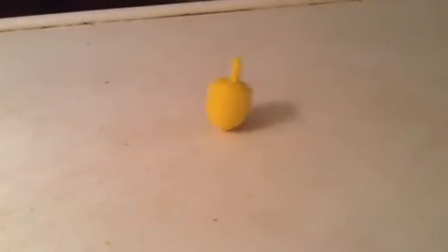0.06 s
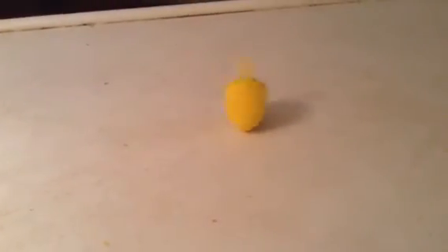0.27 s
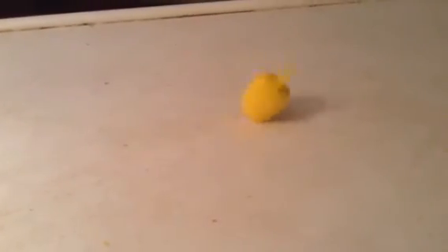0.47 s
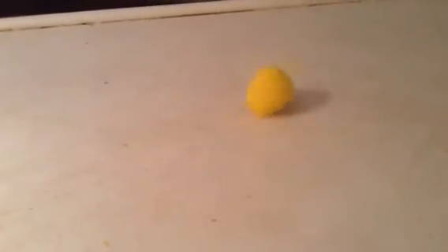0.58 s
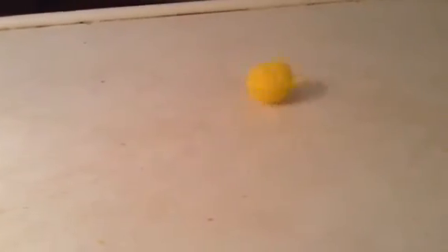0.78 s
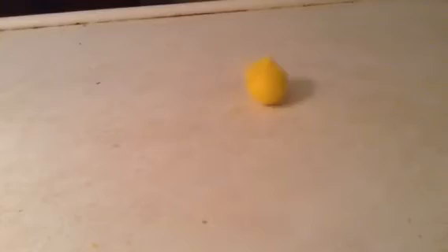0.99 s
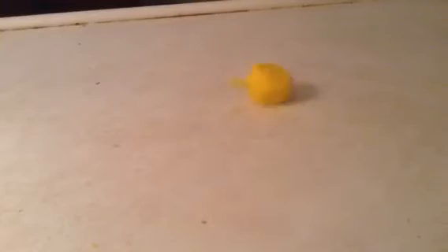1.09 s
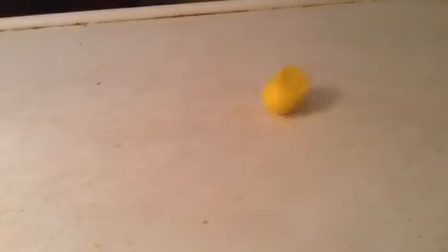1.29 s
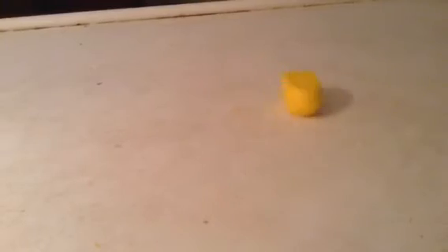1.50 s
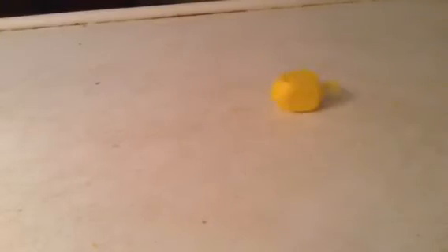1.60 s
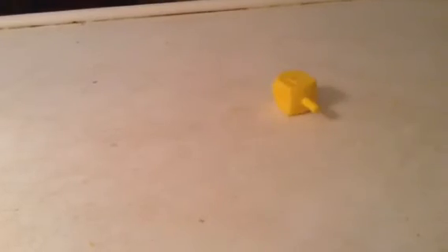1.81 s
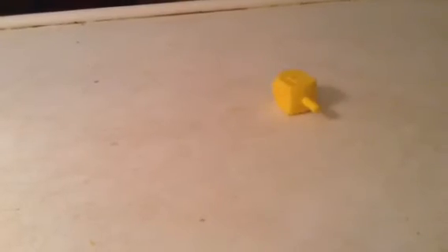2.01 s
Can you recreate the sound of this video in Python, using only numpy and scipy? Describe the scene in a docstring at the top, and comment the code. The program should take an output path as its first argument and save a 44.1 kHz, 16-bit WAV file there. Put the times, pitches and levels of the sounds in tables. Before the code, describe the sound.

In a quiet room, a small plastic spinning top runs down near the microphone. It rattles and rolls with brief scratchy scrapes on a hard board, then topples with a quick clatter of knocks and settles.

```python
"""In a quiet room, a small plastic spinning top runs down on a hollow board.
Its tip rumbles and skips, then the leaning body rolls and scrapes in short strokes; at last its
corners catch, it tumbles over and rocks to rest. Impacts and surface roughness supply contact
forces that excite the modes of the board and the reverberation of the room. Blows and rolling
also ring the top's hollow shell, while grit snaps and sliding friction hisses."""
import sys
import numpy as np
from scipy import signal
from scipy.fft import rfft, irfft
from scipy.io import wavfile

SR = 44100
rng = np.random.default_rng(int(sys.argv[2]) if len(sys.argv) > 2 else 0)


def wrap_up_sound(samples):
    """Save the sound to the file named by the first command line argument, as 16-bit audio."""
    columns = np.atleast_2d(samples).T
    # keep every value between -1 and 1, then stretch to whole-number steps
    tamed = np.clip(columns, -1, 1)
    steps = np.round(tamed * 32767).astype(np.int16)
    wavfile.write(sys.argv[1], SR, steps)


N = 90404
TIME = np.arange(N) / SR
RESPONSE_TIME = np.arange(SR // 4) / SR


def from_db(db):
    """Amplitude ratio of a level in decibels."""
    return 10 ** (np.asarray(db) / 20)


def unit_rms(x):
    """Normalisation to an rms of one."""
    return x / np.sqrt(np.mean(x ** 2) + 1e-20)


def cut(x, hz, kind, order=2):
    """Causal Butterworth low-pass or high-pass filter."""
    return signal.sosfilt(signal.butter(order, min(hz, .45 * SR), kind, fs=SR, output="sos"), x + 1e-18)


def decay(t60, time=TIME):
    """Exponential damping: 60 dB in t60 seconds."""
    return np.exp(-np.log(1000) * time / t60)


def noise(spectrum, size=N):
    """Spectral shaping of white noise, at unit rms."""
    hz, db = np.transpose(spectrum)
    bins = np.maximum(np.fft.rfftfreq(size, 1 / SR), 1)
    gain = from_db(np.interp(np.log(bins), np.log(hz), db))
    return unit_rms(irfft(rfft(rng.standard_normal(size)) * gain, size))


def add(track, s, sound):
    """Superposition of a sound on a track, from s seconds on."""
    start = int(np.clip(s * SR, 0, N - 1))
    track[start:start + len(sound)] += sound[:N - start]


def stroke(s, length, attack_s=.0015, release_s=.0066):
    """Envelope of one contact: linear attack, hold, exponential release."""
    attack = np.clip((TIME - s) / attack_s, 0, 1)
    return attack * np.exp(-np.maximum(TIME - s - length, 0) / release_s)


def roughness(per_s, spread_db=2.5):
    """Shot noise: tiny random impacts of plastic running over the grain of the board."""
    sizes = from_db(spread_db * np.minimum(rng.exponential(1, N), 4)) * rng.choice([-1, 1], N)
    return unit_rms(sizes * (rng.random(N) < per_s / SR))


def modal_sum(modes):
    """Free vibration: a sum of damped modes that start in phase."""
    return sum(from_db(db) * np.cos(2 * np.pi * hz * RESPONSE_TIME) * decay(t60, RESPONSE_TIME)
               for hz, db, t60 in modes)


# Spectrum of the quiet room: (frequency [Hz], relative spectral level [dB])
AMBIENT_SPECTRUM = [(30, -30), (85, 13), (120, 12), (150, -3.5), (215, 11.5), (400, -6.5), (700, -8.5),
                    (1500, -12.5), (3000, -15.5), (6000, -17.5), (11000, -19)]
def ambience(level_db=-59.5):
    """Stationary background noise, strongest at low frequencies."""
    return from_db(level_db) * noise(AMBIENT_SPECTRUM)


# Spectrum of the room's echo: (frequency [Hz], relative spectral level [dB])
REVERB_SPECTRUM = [(110, -18.5), (200, 11), (400, -3), (700, -0.5), (1400, 0.5), (2700, -11.5),
                   (4000, -17.5), (7000, -27.5), (11000, -24)]
def room(force, echo_t60_s=.3, build_s=.006, boom_t60_s=.88):
    """Reverberation: a diffuse echo builds up and decays, and low notes linger as a boom."""
    echo = from_db(-26.5) * noise(REVERB_SPECTRUM) * decay(echo_t60_s) * (1 - np.exp(-TIME / build_s))
    boom = from_db(-55) * unit_rms(cut(noise(REVERB_SPECTRUM), 480, "low")) * decay(boom_t60_s)
    return signal.fftconvolve(force, echo + boom)[:N]


# Modes of the board: (frequency [Hz], relative level [dB], decay time T60 [s])
BOARD_MODES = [(116.8, -40, .6), (210.4, -30, 0.4), (231.3, -29, 0.29), (315.5, -33.5, 0.33),
               (379.6, -20, 0.16), (403.6, -22, .14), (561.1, -29, 0.25), (613.4, -17.5, 0.048),
               (685, -17.5, 0.047), (776, -4, 0.0011), (938, -21.5, 0.022), (1134, -25.5, 0.053),
               (1227, -4.5, 0.0055), (1797, -24, 0.053), (2020, -24.5, 0.023), (2260, -16.5, 0.01),
               (2716, -12.5, 0.0053)]
# Dense ringing of the board: (frequency [Hz], relative spectral level [dB])
RING_SPECTRUM = [(150, -65), (400, 6), (650, 4), (850, -7), (1100, 0.5), (1400, 14.5), (1700, -1.5),
                 (2800, -10.5), (3500, -13), (6000, -24), (8000, -45), (9700, -13), (11500, -30)]
def spot_response(detune=.015):
    """Impulse response of one spot on the board: a modal clack, a plastic tick and dense ringing."""
    size = len(RESPONSE_TIME)
    local_modes = [(hz * (1 + detune * rng.uniform(-.98, 1)), db + rng.uniform(-.67, 1), t60)
                   for hz, db, t60 in BOARD_MODES]
    clack = cut(modal_sum(local_modes), 2080, "low")
    treble = unit_rms(cut(rng.standard_normal(size), 4860, "high"))   # only hard contacts excite it
    tick = from_db(-9) * treble * decay(.0011, RESPONSE_TIME)
    ring = from_db(-17) * noise(RING_SPECTRUM, size) * decay(.033, RESPONSE_TIME)
    return tick + ring - clack / np.abs(clack).max()


def board(force, spot_s=.06):
    """Time-varying convolution: the top wanders, so overlapping spans of force meet different spots."""
    out, step = np.zeros(N), int(spot_s * SR)
    padded, window = np.pad(force, (step, 2 * step)), np.hanning(2 * step)
    for start in range(0, N, step):
        response = signal.fftconvolve(padded[start:start + 2 * step] * window, spot_response())
        add(out, max(start - step, 0) / SR, response[max(step - start, 0):])
    return out


# Modes of the top's body: (frequency [Hz], relative level [dB], decay time T60 [s])
SHELL_MODES = [(1090, -23.5, 0.053), (1339, -20.5, 0.055), (1401, -33.5, 0.029)]
def shell(force):
    """Resonance: contact force drives the modes of the hollow plastic body."""
    return -signal.fftconvolve(force, modal_sum(SHELL_MODES))[:N]


# Snaps of grit under the top: (time [s], peak level [dB])
GRIT_SNAPS = [(0.44, -50), (0.6867, -50.5), (0.7976, -44), (0.8115, -45.5), (0.8433, -49), (0.8581, -37),
              (1.1625, -50.5), (1.188, -46.5), (1.5525, -39)]
def grit(low_hz=3770, high_hz=6700, t60_s=.0071):
    """Band-limited transients: each snap of grit is an impulse with a short crunch."""
    out = np.zeros(N)
    for s, db in GRIT_SNAPS:
        crunch = from_db(-9.5) * rng.standard_normal(len(RESPONSE_TIME)) * decay(t60_s, RESPONSE_TIME)
        snap = signal.unit_impulse(len(crunch)) + crunch
        snap = cut(cut(snap, low_hz, "high"), high_hz, "low")
        add(out, s, from_db(db) * snap / np.abs(snap).max())
    return out


# Slides of the body: (time [s], duration [s], level [dB])
SLIDE_STROKES = [(0.81, 0.04, -69), (0.858, 0.072, -66), (1.185, 0.015, -66)]
# Spectrum of sliding: (frequency [Hz], relative spectral level [dB])
FRICTION_SPECTRUM = [(3000, -5), (5200, -1), (7000, -13), (11000, -13)]
def sliding():
    """Friction noise: a thin, sandy hiss while the body slides."""
    envelope = sum(from_db(db) * stroke(s, length) for s, length, db in SLIDE_STROKES)
    return noise(FRICTION_SPECTRUM) * envelope


def tip_chatter(start_s=.2, length_s=.352, force_db=-73.5):
    """Intermittent contact: sparse ticks of force as the upright tip crosses the grain."""
    ticks = unit_rms(cut(roughness(per_s=230), 2500, "low", order=4))
    return from_db(force_db) * stroke(start_s, length_s) * ticks


# Envelope of the turning top's rumble: (time [s], force level [dB])
RUMBLE_ENVELOPE = [(0, -90), (.07, -77.5), (.18, -68.5), (.25, -63), (.36, -69.5), (.48, -65), (.63, -68),
                   (.72, -66.5), (.98, -68.5), (1.10, -64.5), (1.21, -65), (1.25, -90), (1.33, -69.5),
                   (1.40, -78.5), (1.48, -70), (1.57, -67.5), (1.76, -63), (1.83, -86), (2.05, -105)]
def spin_rumble(cutoff_hz=736):
    """Roughness excitation: the turning top exerts a dull, lumpy force."""
    envelope = from_db(np.interp(TIME, *np.transpose(RUMBLE_ENVELOPE)))
    return envelope * unit_rms(cut(roughness(per_s=800), cutoff_hz, "low", order=4))


# Rolls of the leaning body: (time [s], duration [s], force level [dB], relative hiss level [dB])
ROLL_STROKES = [(0.203, 0.081, -67, -10), (.547, 0.044, -64, -8), (0.695, 0.031, -61.5, -5.5),
                (0.739, 0.017, -63.5, -3.5), (0.766, 0.021, -60, -3), (0.811, .032, -60.5, -2),
                (0.855, 0.013, -63.5, -2.5), (.872, 0.044, -61, -3.5), (0.937, .022, -66, -1),
                (0.96, 0.019, -54, -5.5), (1.024, 0.036, -61.5, -2.5), (1.122, 0.029, -65, -3.5),
                (1.185, 0.018, -62.5, -1), (1.28, 0.022, -58.5, -7.5), (1.311, 0.031, -63.5, -2),
                (1.438, 0.017, -67.5, -11)]
def rolling(bumps_per_s=2200, crossover_hz=1550):
    """Rolling contact with slip: a midrange force from the grain, with a scratchy hiss above it."""
    grain = cut(roughness(bumps_per_s), 284, "high", order=1)
    grain = unit_rms(cut(grain, crossover_hz, "low", order=10))
    hiss = cut(roughness(bumps_per_s), crossover_hz, "high")
    hiss = unit_rms(cut(hiss, 6500, "low", order=1))
    return sum(from_db(db) * stroke(s, length) * (grain + from_db(hiss_db) * hiss)
               for s, length, db, hiss_db in ROLL_STROKES)


# Blows of the top: (time [s], impulse level [dB], cut-off [Hz], relative drive of the shell [dB])
BLOWS = [(0.078, -41.5, 1600, -9), (0.104, -43, 1780, -16), (0.145, -35.5, 1670, -23),
         (.174, -36, 1900, -17), (0.2041, -28.5, 2930, -19), (0.2103, -26, 2270, -13),
         (.243, -32, 2300, -15), (0.2846, -23, 2630, -15), (0.3201, -22.5, 2870, -12),
         (0.362, -46, 2360, -10), (.3957, -22.5, 3400, -12), (.4403, -19, 3200, -10),
         (0.4466, -22, 2200, -2), (0.4623, -22.5, 2220, -6), (0.489, -25, 1800, -18),
         (0.5186, -23.5, 2200, -10), (0.5937, -30, 1890, -10), (.6586, -27, 1600, -11),
         (0.687, -22, 3100, -7), (0.8108, -27, 1800, -3), (.858, -30, 3530, 4), (0.868, -24, 1700, -16),
         (0.9149, -19, 2170, 3.5), (1.028, -27, 1730, 2), (1.0661, -26.5, 1820, -7),
         (1.2859, -28, 2580, -7), (1.2933, -20, 1790, 2.5), (1.314, -14, 5650, -4),
         (1.3383, -16.5, 2130, -3), (1.437, -32, 1700, -7), (1.4956, -15, 4440, -3),
         (1.5225, -21.5, 2090, -10), (1.531, -23, 1940, -9), (1.539, -26, 1700, 0),
         (1.5507, -12.5, 2470, 4), (1.5533, -15, 1950, 1.5), (1.5604, -12.5, 9600, -0.5),
         (1.564, -23, 920, -14), (1.5985, -24, 2310, 3), (1.6116, -17.5, 2620, -5), (1.624, -22, 1910, -12),
         (1.6558, -17, 8200, -2), (1.6706, -19, 2000, -11), (1.7064, -26, 2380, -10),
         (1.719, -28, 1930, -6), (1.7317, -16.5, 2070, -23), (1.7727, -21.5, 1778, -7),
         (1.801, -30.5, 1850, -11)]
def impacts(rebound_db=-8.5):
    """Elastic impact: a harder contact gives a shorter, brighter force pulse; each rebounds once."""
    on_board, on_shell = np.zeros((2, N))
    rebound_delays_s = rng.uniform(.001, .00401, len(BLOWS))
    for (s, db, hz, shell_db), delay in zip(BLOWS, rebound_delays_s):
        pulse = from_db(db) * cut(signal.unit_impulse(SR // 20), hz, "low", order=4)
        add(on_board, s, pulse)
        add(on_board, s + delay, from_db(rebound_db) * pulse)
        add(on_shell, s, from_db(shell_db) * pulse)
    return on_board, on_shell


def scene():
    """Source and filter: forces drive board, shell and room; grit, sliding and ambience add directly."""
    on_board, on_shell = impacts()
    roll_force = rolling()
    force = on_board + spin_rumble() + tip_chatter() + roll_force
    shell_ring = shell(on_shell + from_db(-9) * roll_force)
    slide_hiss = sliding()
    return (board(force) + shell_ring + room(force) + grit() + slide_hiss + ambience())[None]


def record(dry, bass_hz=140.4, treble_hz=12000):
    """Band limiting: a small microphone weakens the deep bass and cuts the highest treble."""
    thin = cut(dry, bass_hz, "high", order=8) + from_db(-26) * dry
    return signal.sosfilt(signal.ellip(10, .2, 70, treble_hz, fs=SR, output="sos"), thin)


dry = scene()
out = record(dry)
wrap_up_sound(out)
```